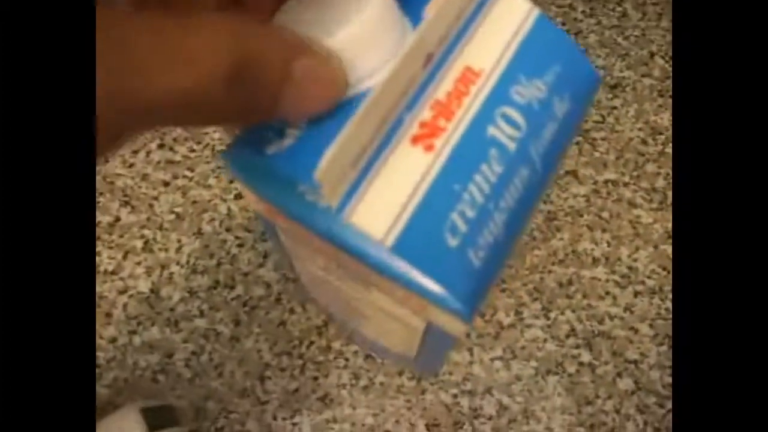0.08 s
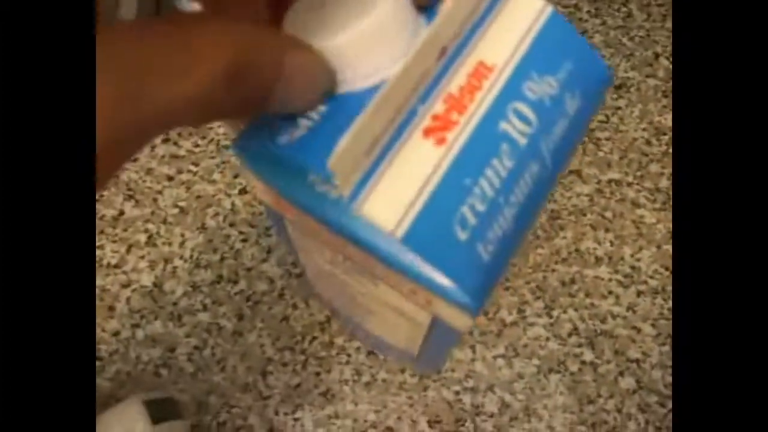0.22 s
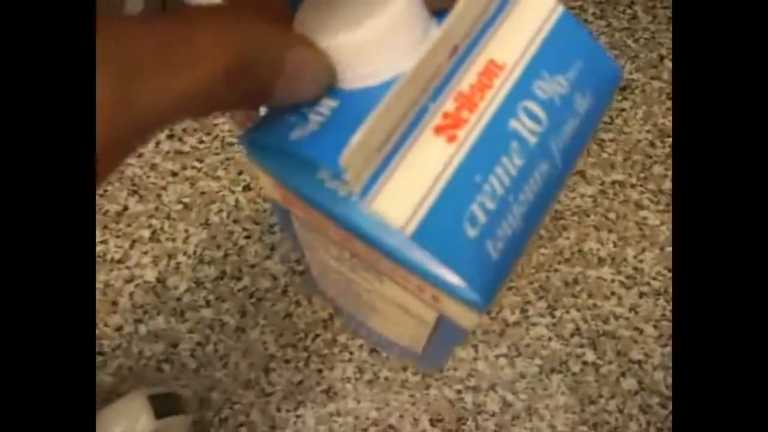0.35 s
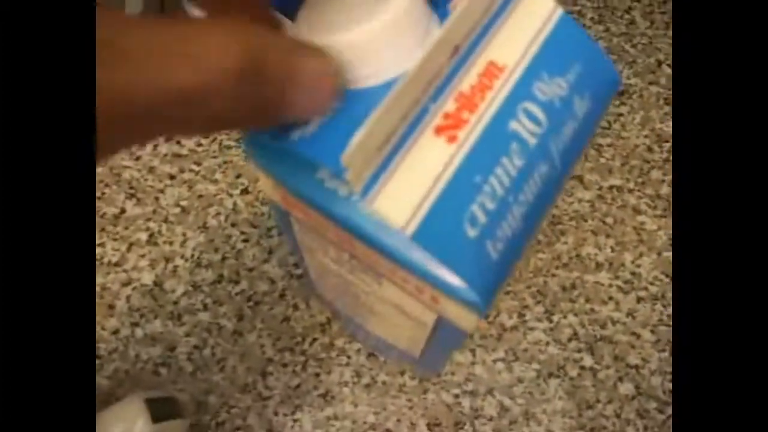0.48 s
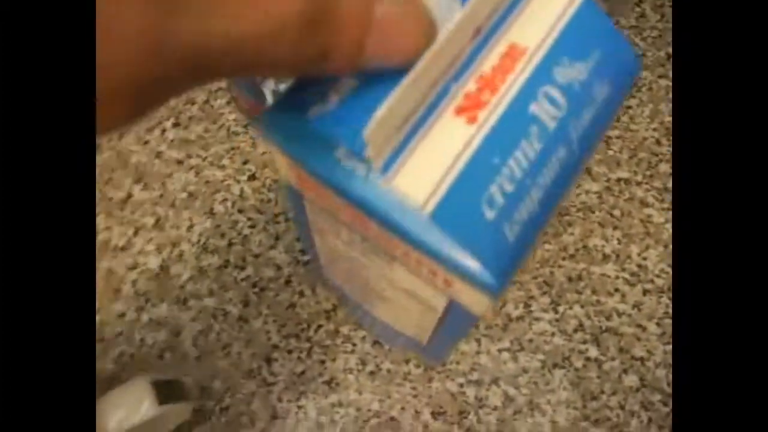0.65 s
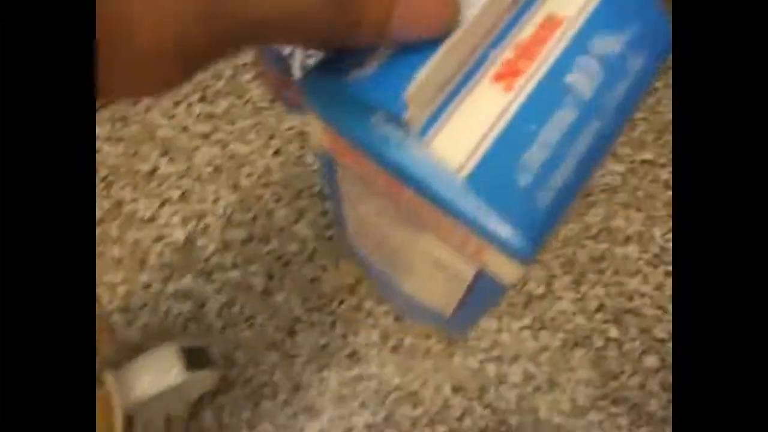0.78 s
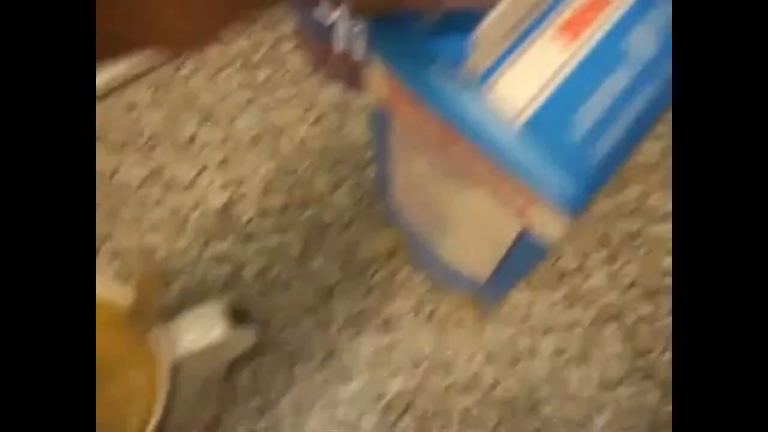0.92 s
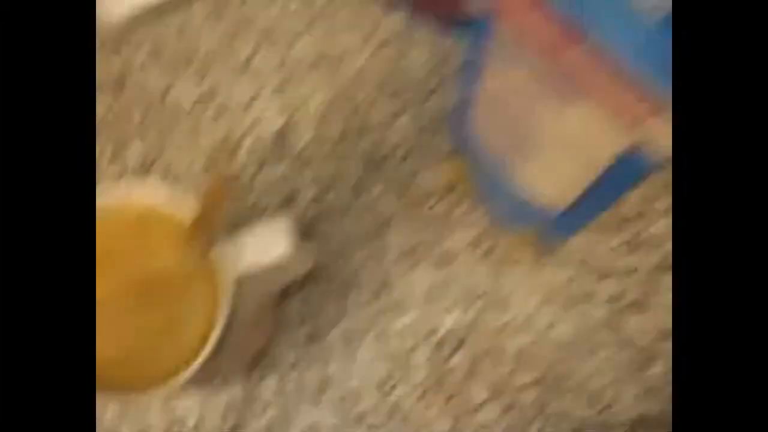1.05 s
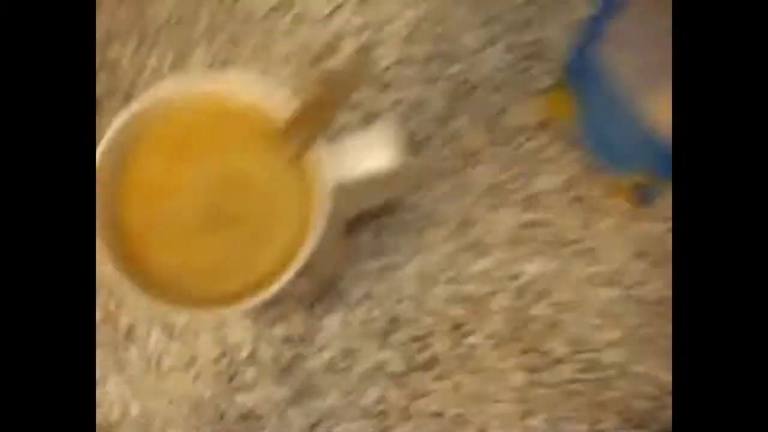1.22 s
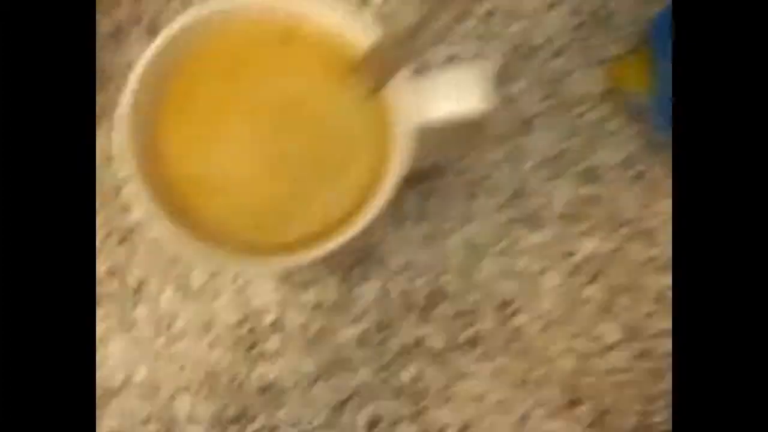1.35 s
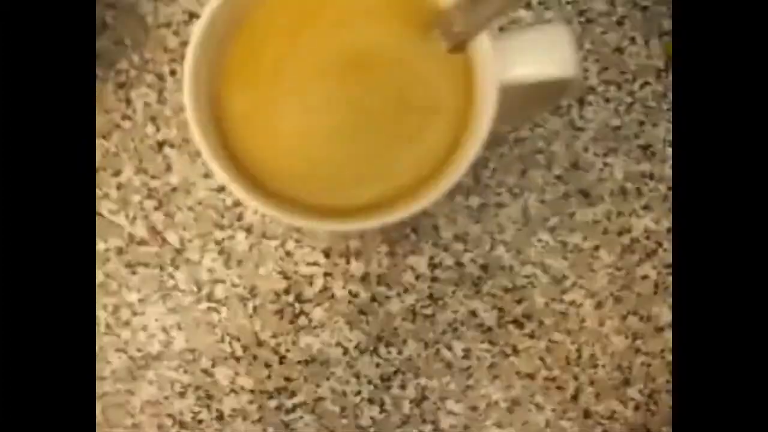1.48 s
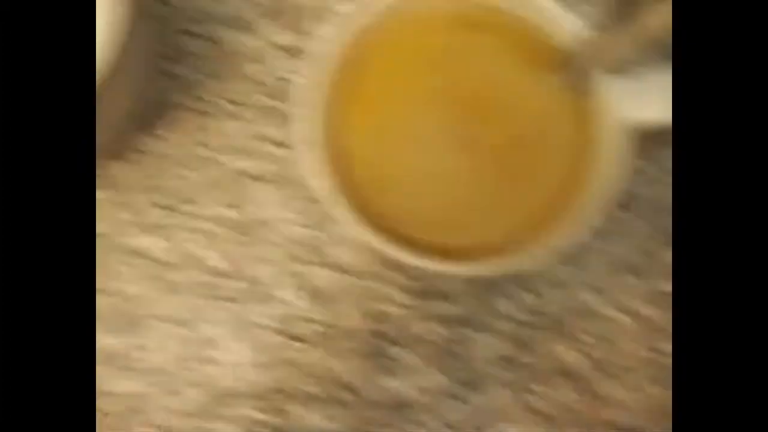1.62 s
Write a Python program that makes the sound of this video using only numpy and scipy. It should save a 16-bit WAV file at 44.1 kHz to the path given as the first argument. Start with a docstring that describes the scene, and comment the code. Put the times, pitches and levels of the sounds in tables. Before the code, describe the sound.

Close in a small kitchen, light cap ticks precede a sharp, overloaded carton knock; more ticks, a double softer knock, then a quiet mug tap with a short scrape, over low hum, hiss and faint electronic whine.

```python
"""Kitchen counter, a small narrow-band camera close by: a hand fiddles with the plastic cap of a cream carton,
knocks the carton on the counter, then a mug is nudged and scrapes briefly. Carton, cap and mug are struck sets
of damped modes; rustle and scrape are dense clicks in filters; the room adds a noise tail. The microphone also
hears mains hum, hiss, the camera's faint chirping whine and thumps of the hand holding it; the loudest knock
overloads it."""
import sys
import numpy as np
from scipy import signal
from scipy.fft import rfft, irfft
from scipy.io import wavfile
from scipy.ndimage import uniform_filter1d

SR = 44100
rng = np.random.default_rng(int(sys.argv[2]) if len(sys.argv) > 2 else 0)


def to_linear_factor(level_db):
    """Convert decibel levels (scalar or array-like) to linear amplitude factors."""
    exponent = np.asarray(level_db, float) / 20
    return 10 ** exponent


def generate_wav(sig):
    """Save sig (samples, or channels by samples) to the path in sys.argv[1] as 16-bit PCM at SR."""
    pcm = np.round(np.clip(np.atleast_2d(sig).T, -1, 1) * 32767).astype(np.int16)
    wavfile.write(sys.argv[1], SR, pcm)


N = 74970

# Carton struck on the counter. Each row: start in seconds, strength in dB, treble tilt in dB per octave,
# contact in ms, share of the free ring time, gain in dB of the modes under 500 Hz. Extremes of contact
# and share are limited in blows().
CARTON_KNOCKS = [(.2250, -1.5, 8.5, .3, 0.58, -5), (.2268, -1.5, -0.5, .3, 0.65, -10.5),
                 (.2292, -1, -7.5, 0.46, 0.99, -0.5), (.2425, -11.5, 4, .5, .5, -2),
                 (.2545, -24, 4, 0.33, .4, 0), (.264, -32, 2, .4, .4, 0.5),
                 (.9835, -13.5, 7, .3, 0.61, 16.5), (.9862, -22, 0.5, 0.1, 0.34, 2.5),
                 (.9915, -13.5, 10.5, 1, 0.27, 11.5), (1.0, -39.5, 4, 0.365, .5, -1.5),
                 (1.017, -33, -8, 0.32, 0.44, 14.5), (1.0876, -10.5, 4, 0.26, 0.36, -10.5),
                 (1.0888, -5, 1, .4, 0.34, -5), (1.0950, -16, 2, .4, 0.57, -14),
                 (1.102, -24, -27, 0.34, 1, 1)]
# Ringing of the carton. Each row: mode in Hz, relative level in dB, free t60 in seconds.
CARTON_MODES = [(300, -42.5, .05), (373, -19, .06), (448, -15, 0.086), (704, -5.5, 0.071), (751, -8, 0.058),
                (756, -1, 0.067), (820, -15.5, 0.079), (993, 9.5, 0.03), (1170, -8.5, 0.058),
                (1231, -8.5, 0.14), (1259, -14, 0.072), (1674, -9.5, 0.03), (1806, -20.5, 0.012),
                (2290, -29, .035), (2270, -26, 0.085), (2885, -11.5, 0.044), (2948, -5, 0.049),
                (3263, -17.5, 0.012), (3300, -13, 0.09)]
# Cap ticking on its thread. Each row: start in seconds, strength in dB, treble tilt in dB per octave,
# contact in ms, share of the free ring time.
CAP_TICKS = [(.081, -38, -1, 0.4, .5), (.0925, -27.5, -10, 0.63, 0.39), (.0985, -46, 8, 0.3, 0.53),
             (.1135, -28.5, 0, 0.47, 0.22), (.1955, -36.5, -4.5, .3, 0.26), (.345, -34.5, 1, 0.32, 0.73),
             (.462, -35.5, -10, 0.49, 0.75), (.568, -23.5, 4, 0.22, 0.89), (.5725, -37, 12, .3, .8),
             (.576, -22, -3, 0.13, 0.57), (.6035, -33, 8.5, 0.38, .5), (.619, -44, -1.5, .3, .5),
             (.7693, -19, 3.5, 0.14, 0.34), (.7732, -24.5, 3.5, 0.36, 0.81), (.779, -28.5, -1.5, 0.27, 1),
             (.835, -52, -10, 0.48, 0.38), (1.269, -47.5, -6.5, 0.37, .5), (1.285, -47, 2.5, 0.41, 0.46)]
# Ringing of the cap. Each row: mode in Hz, relative level in dB, free t60 in seconds.
CAP_MODES = [(620, -21, .035), (810, -16, 0.03), (981, 11.5, 0.061), (1136, -2, 0.11), (2110, -16.5, 0.023),
             (2302, -1, 0.09), (2800, -15, 0.075), (2740, -22, 0.047), (3720, -11, 0.075)]
# Mug base meeting the counter. Each row: start in seconds, strength in dB, treble tilt in dB per octave,
# contact in ms, share of the free ring time.
MUG_HITS = [(1.5028, -17.5, -0.5, 0.12, 1), (1.5935, -34.5, -4.5, 0.18, .5), (1.624, -30.5, 0.5, 0.21, .9)]
# Ringing of the mug. Each row: mode in Hz, relative level in dB, free t60 in seconds.
MUG_MODES = [(260, -0.5, 0.014), (435, 1, 0.025), (930, -7, 0.075), (1470, -8, .02), (2000, -1.5, .02),
             (2800, -22, .015), (3540, -4, .015)]
# Bass limit of each struck body, by name, in Hz.
LOWEST_HZ = {"carton": 309.4, "cap": 534, "mug": 139}
# Mug scraping on the counter. Each row: time in seconds, level in dB.
SCRAPE_LEVEL = [(1.502, -60), (1.505, -34.5), (1.513, -34.5), (1.523, -30), (1.535, -36), (1.55, -42.5),
                (1.558, -78)]
# Spectrum of the scrape. Each row: frequency in Hz, relative level in dB per Hz.
SCRAPE_COLOUR = [(88, -56.5), (150, -26), (589, -11), (1200, -8.5), (1390, -11.5), (1820, -6.5),
                 (1970, -16), (2790, -8.5), (3700, -18), (4810, -45), (8140, -120)]
# Carton rustling in the hand. Each row: time in seconds, level in dB, extra gain of its treble in dB.
RUSTLE_LEVEL = [(0, -51, 2.5), (.05, -58.5, -5), (.075, -54, 2), (.09, -47, 2), (.105, -48, -5),
                (.125, -57.5, -3), (.2, -61, 8), (.235, -49, -1), (.26, -43.5, -0.5), (.32, -48, -4),
                (.37, -48.5, -0.5), (.41, -43.5, -1.5), (.44, -51, -0.5), (.5, -55, 2), (.55, -55, -4),
                (.6, -47, -4.5), (.625, -57, 9.5), (.65, -60.5, 0.5), (.79, -55.5, -8.5), (.835, -49, -9),
                (.87, -59, 4), (.97, -59.5, -2), (1.0, -40, -10), (1.03, -54.5, -4), (1.042, -39, -12),
                (1.055, -49, -4), (1.08, -51, 0), (1.12, -64, -14), (1.2, -62, 3.5), (1.25, -57.5, -6),
                (1.283, -53, 11), (1.31, -58.5, -0.5), (1.5, -60.5, 3), (1.62, -51.5, -5),
                (1.7, -54.5, 3.5)]
# Broad resonances of the rustle, three low and two high. Each row: centre in Hz, width in Hz, relative level in dB.
RUSTLE_BANDS = [(350, 300, 4), (670, 450, 7.5), (1030, 495, 0.5), (2480, 1660, -0.5), (3100, 300, -18.5)]
# Hand on the camera body. Each row: start in seconds, starting level in dB, pitch in Hz, t60 in seconds.
GRIP_THUMPS = [(0.144, -40, 70, .05), (0.23, -32, 105.8, 0.19), (0.818, -43, 198, 0.11),
               (0.876, -39.5, 112, 0.027), (1.275, -36, 222, 0.031), (1.504, -37, 48.3, 0.11),
               (1.535, -39, 125, 0.092), (1.5946, -27, 109, 0.026), (1.621, -38, 35.5, 0.76),
               (1.643, -31.5, 61.6, 0.06), (1.663, -35, 44.5, 0.13)]
# Mains hum. Each row: partial in Hz, rms level in dB that it wavers around.
HUM_PARTIALS = [(59.8, -57), (119.6, -64.5), (179.5, -70), (239.5, -63.5), (299.5, -68.5), (359.5, -68),
                (479, -77)]
# Spectrum of the hiss. Each row: frequency in Hz, relative level in dB per Hz.
HISS_COLOUR = [(12, -42), (20, -11), (129, -0.5), (227, -17), (271, -8.5), (558, -12.5), (680, -34),
               (846, -19.5), (2640, -33), (3080, -18.5), (3750, -26), (4880, -67.5), (8250, -120)]


def table(rows):
    """Columns of a table as arrays."""
    return np.array(rows, float).T


def unit(x):
    """Scale to an rms of 1."""
    return x / np.sqrt(np.mean(x ** 2))


def colour(x, points):
    """Shape a spectrum by (Hz, dB) points joined over log frequency."""
    hz, db = table(points)
    f = np.fft.rfftfreq(N, 1 / SR) + 1e-3
    return irfft(rfft(x) * to_linear_factor(np.interp(np.log(f), np.log(hz), db)), N)


def band(x, hz, width):
    """Two-pole resonance, gain 1 at the centre."""
    return signal.lfilter(*signal.iirpeak(hz, hz / max(width, 1), fs=SR), x)


def walk(rate):
    """Slow smooth chance with a spread near 1, renewed `rate` times a second."""
    k = int(SR / rate)
    steps = np.repeat(rng.standard_normal(N // k + 1), k)
    return 1.3 * uniform_filter1d(uniform_filter1d(steps, k), k)[:N]


def curve(rows, axis=1):
    """Gain over time from a dB column of a table."""
    cols = table(rows)
    return to_linear_factor(np.interp(np.arange(N) / SR, cols[0], cols[axis]))


def grains(per_s, spread_db):
    """Dense random clicks, a few much larger than the rest."""
    hit = rng.random(N) < per_s / SR
    sign = rng.choice([-1, 1], N)
    return unit(hit * sign * to_linear_factor(spread_db * rng.exponential(size=N)))


def add(out, at_s, x):
    """Lay a sound into the scene at a time in seconds."""
    i = int(at_s * SR)
    out[i:i + len(x)] += x[:N - i]


def blows(events, modes, low_hz):
    """Each blow pushes for its contact time, rings the modes with its own mix and adds a short noise crack."""
    level_scatter_db, pitch_scatter = 1.5, .012
    crack_db, crack_decay_s = -7.5, .0059
    out, t = np.zeros(N), np.arange(SR // 5) / SR
    hz, db, t60 = table(modes)
    chance = rng.standard_normal((len(events), 2, len(hz)))
    noises = rng.standard_normal((len(events), len(t)))
    for event, (level_chance, pitch_chance), noise in zip(events, chance, noises):
        at, strength_db, tilt_db, contact_ms, free, *bass_db = event
        mode_db = db + tilt_db * np.log2(hz / 1000) + sum(bass_db) * (hz < 500)
        gain = to_linear_factor(mode_db + level_scatter_db * level_chance)
        pitch = hz * (1 + pitch_scatter * pitch_chance)
        decay = np.exp(-np.log(1000) * t[:, None] / (t60 * np.clip(free, .1, .8)))
        ring = (gain * np.sin(2 * np.pi * pitch * t[:, None]) * decay).sum(axis=1)
        ring = ring / np.abs(ring).max()
        crack = band(noise, 2700, 1800) * np.exp(-t / crack_decay_s)
        ring = ring + to_linear_factor(crack_db + tilt_db) * crack
        # a longer contact dulls the treble
        u = np.arange(64) / SR / (np.clip(contact_ms, .05, 1.4) / 1000)
        push = np.sin(np.pi * np.minimum(u, 1)) ** 2
        add(out, at, to_linear_factor(strength_db) * np.convolve(ring, push / push.sum()))
    # small bodies radiate no bass
    return signal.sosfilt(signal.butter(3, low_hz, "high", fs=SR, output="sos"), out)


def carton_knocks():
    """The carton rings in its damped modes after each knock on the counter."""
    return blows(CARTON_KNOCKS, CARTON_MODES, LOWEST_HZ["carton"])


def cap_ticks():
    """The plastic cap ticks on its thread and rings in its own modes."""
    return blows(CAP_TICKS, CAP_MODES, LOWEST_HZ["cap"])


def mug_hits():
    """The mug base meets the counter and rings in short damped modes."""
    return blows(MUG_HITS, MUG_MODES, LOWEST_HZ["mug"])


def scrape():
    """Stick-slip clicks of the mug base over the stone, coloured by a fixed spectrum."""
    t = np.arange(N) / SR
    on = (t > SCRAPE_LEVEL[0][0]) & (t < SCRAPE_LEVEL[-1][0])
    clicks = grains(per_s=6000, spread_db=2.5)
    return on * curve(SCRAPE_LEVEL) * unit(colour(clicks, SCRAPE_COLOUR))


def rustle():
    """Small creaks of board and cap in their broad resonances."""
    creaks = grains(per_s=3000, spread_db=2.5)
    rings = [to_linear_factor(db) * band(band(creaks, hz, width), hz, width) for hz, width, db in RUSTLE_BANDS]
    low, high = sum(rings[:3]), sum(rings[3:])
    return curve(RUSTLE_LEVEL) * (low + curve(RUSTLE_LEVEL, axis=2) * high) / np.std(low)


def thumps():
    """Low damped swings of the camera body under the gripping hand."""
    out, t = np.zeros(N), np.arange(SR // 4) / SR
    for at, db, hz, t60 in GRIP_THUMPS:
        decay = np.exp(-np.log(1000) * t / t60)
        add(out, at, -to_linear_factor(db) * np.sin(2 * np.pi * hz * t) * decay)
    return out


def room(x):
    """Kitchen tail: decaying noise that fades in after a short gap."""
    t60_s, gap_s, level_db = .33, .008, -14.5
    t = np.arange(SR // 2) / SR
    fade_in = np.clip(t / gap_s - 1, 0, 1)
    tail = rng.standard_normal(len(t)) * np.exp(-np.log(1000) * t / t60_s) * fade_in
    return to_linear_factor(level_db) * signal.fftconvolve(x, tail / np.sqrt(np.sum(tail ** 2)))[:N]


def hum():
    """Mains hum: steady pitches, each partial wavering in level on its own."""
    waver_db, waver_per_s = 1.5, 8
    out, t = np.zeros(N), np.arange(N) / SR
    for hz, db in HUM_PARTIALS:
        level = np.sqrt(2) * to_linear_factor(db + waver_db * walk(waver_per_s))
        out += level * np.sin(2 * np.pi * (hz * t + rng.random()))
    return out


def hiss():
    """Room hiss: coloured noise whose level flickers a little."""
    level_db, flicker_db, flicker_per_s = -52, 1.2, 12
    level = to_linear_factor(level_db + flicker_db * walk(flicker_per_s))
    return level * unit(colour(rng.standard_normal(N), HISS_COLOUR))


def whine():
    """A thin, unsteady falling tone from the camera electronics, repeating with every picture."""
    pictures_per_s, phase_s, length_s = 15, .052, .056
    top_hz, end_hz, bend = 3360, 2900, 1.4
    level_db, flicker_db, wobble = -62, 2.5, .009
    t = np.arange(N) / SR
    u = np.minimum((t - phase_s) % (1 / pictures_per_s) / length_s, 1)  # 0 to 1 through each chirp
    hz = (top_hz + (end_hz - top_hz) * u ** bend) * (1 + wobble * walk(70))
    swell = np.sqrt(np.sin(np.pi * u).clip(0))
    level = to_linear_factor(level_db + flicker_db * walk(90)) * np.sqrt(2)
    return level * swell * np.sin(2 * np.pi * np.cumsum(hz) / SR)


def scene():
    """Everything at the microphone; only the blows and the scrape excite the room tail."""
    near = carton_knocks() + cap_ticks() + mug_hits() + scrape()
    return (near + room(near) + rustle() + thumps() + hum() + hiss() + whine())[None]


def low_pass(x):
    """Removes everything above the highest recorded frequency."""
    return signal.sosfilt(signal.butter(12, 16510, fs=SR, output="sos"), x)


def record(dry):
    """The camera's narrow band, then overload that rounds off the loudest swings."""
    band_hz, ceiling_db, hardness = 3680, -5.8, 8
    x = signal.sosfilt(signal.ellip(10, .3, 66, band_hz, fs=SR, output="sos"), dry)
    x = x / (1 + np.abs(x / to_linear_factor(ceiling_db)) ** hardness) ** (1 / hardness)
    return low_pass(x)


dry = scene()
out = record(dry)
generate_wav(out)
```